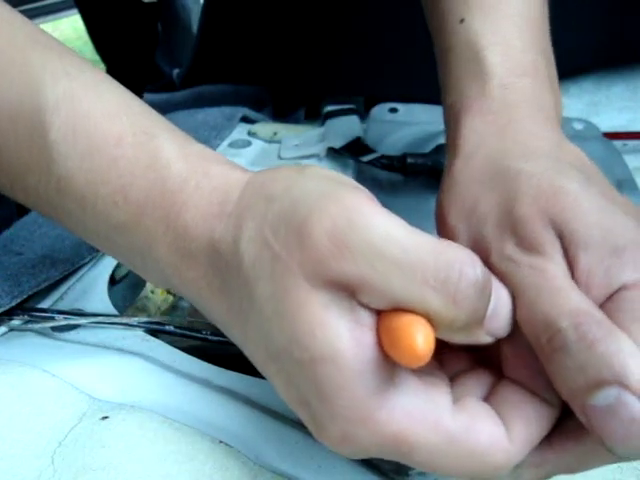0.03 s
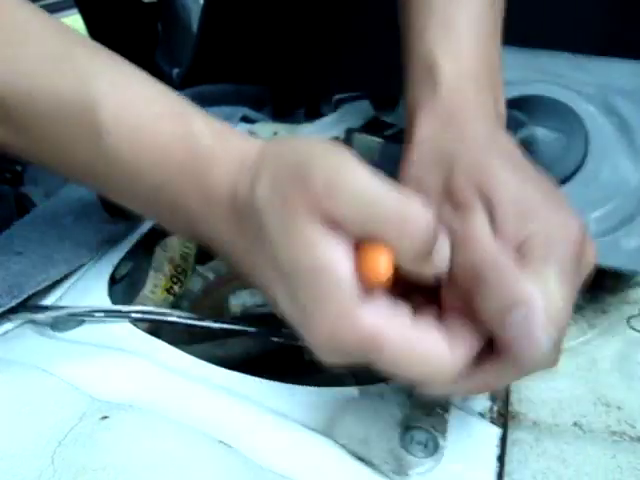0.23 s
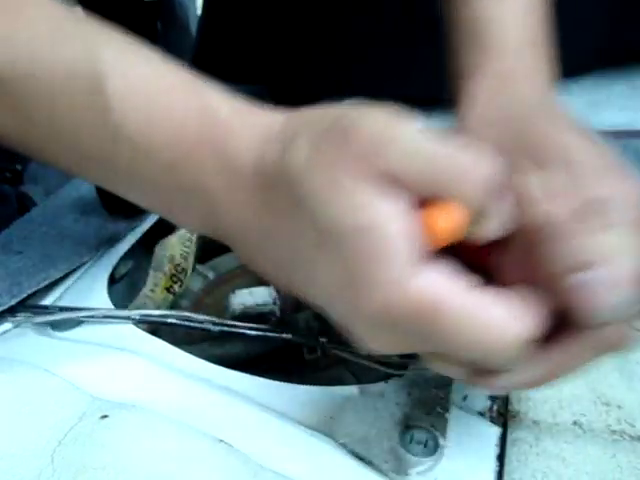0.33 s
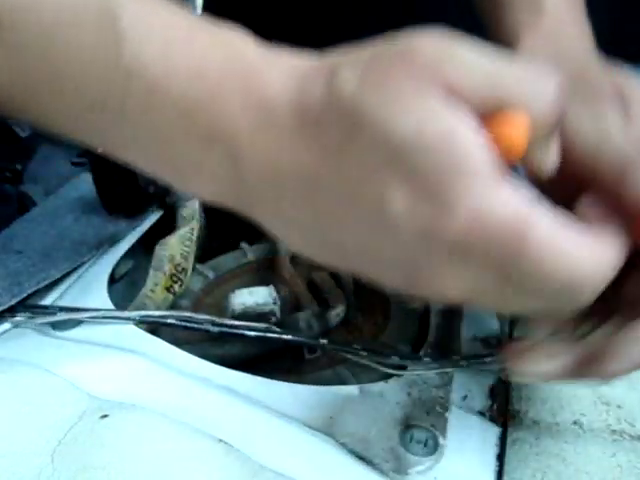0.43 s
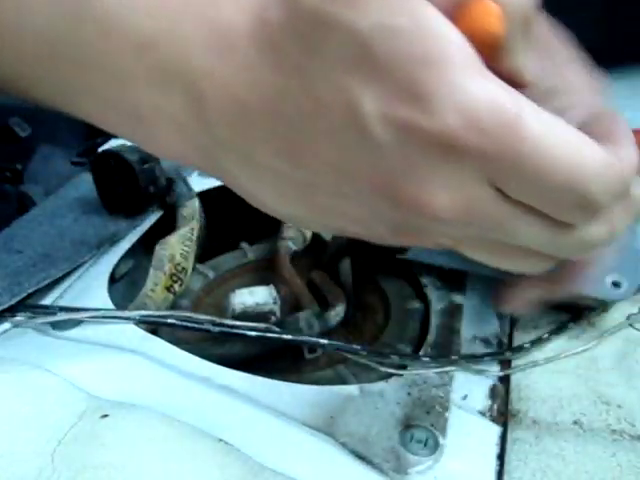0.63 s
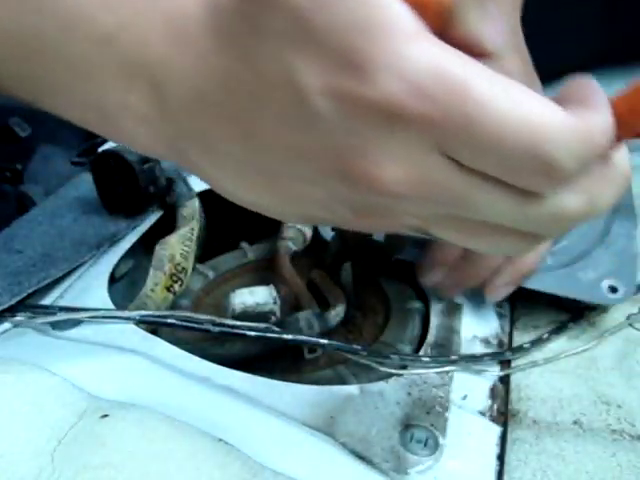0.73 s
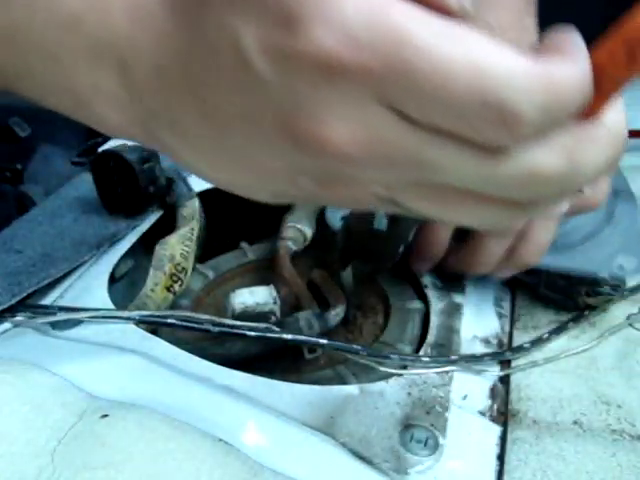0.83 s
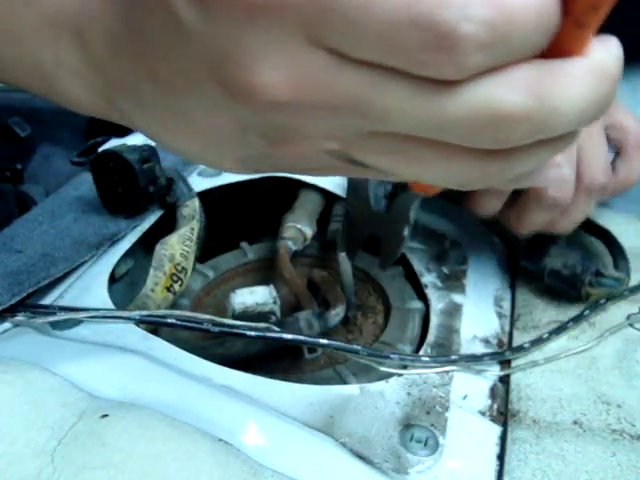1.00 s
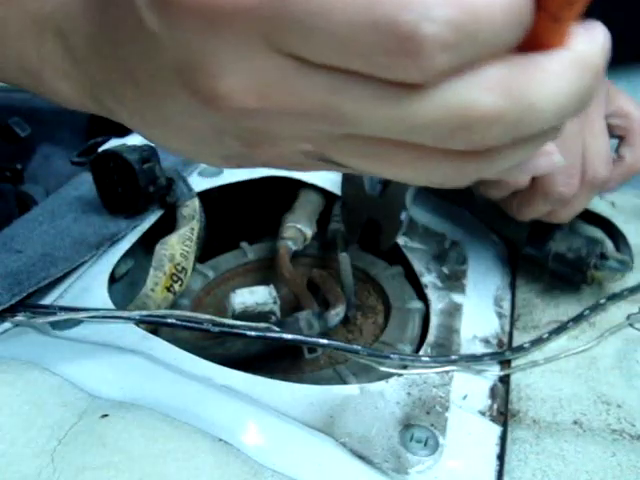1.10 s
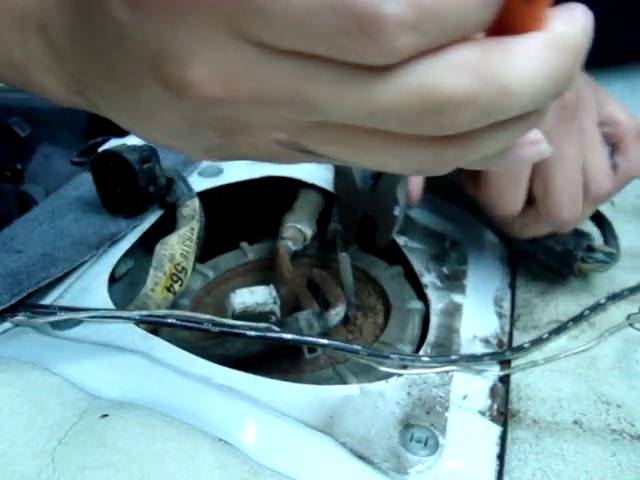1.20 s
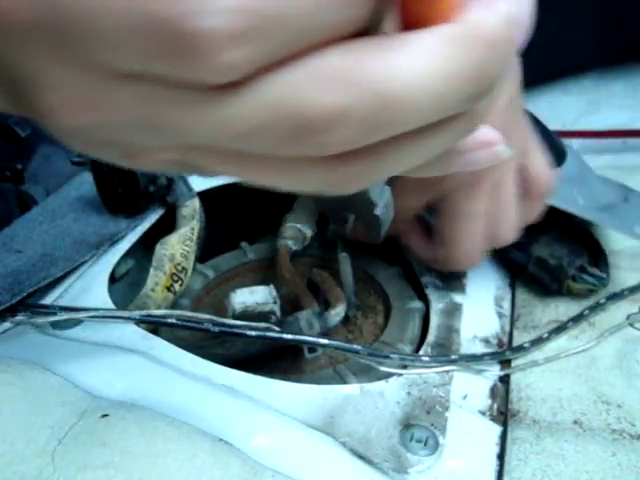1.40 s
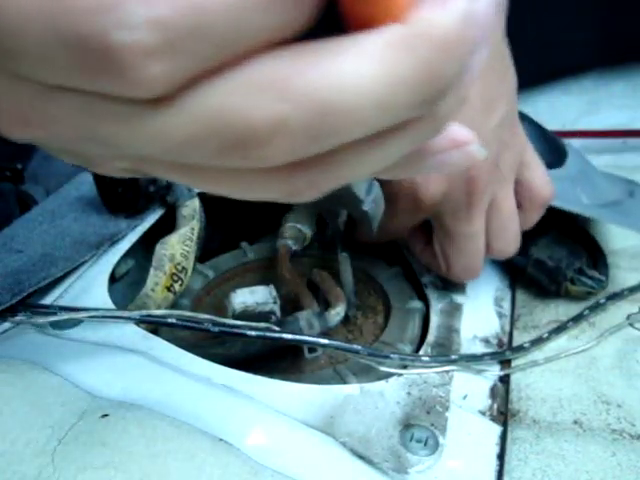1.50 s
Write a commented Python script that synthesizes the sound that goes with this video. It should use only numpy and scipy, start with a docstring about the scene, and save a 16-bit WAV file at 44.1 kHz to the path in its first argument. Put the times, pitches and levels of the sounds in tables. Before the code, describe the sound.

Pliers clank and chatter on a steel fitting. Quiet air and a faint rub come first; at 0.25 seconds a thin metal cover scrapes with low knocks until 0.4. A sharp clank at 0.44 leads to dense, raspy rattling through 0.8, loudest near 0.64. Lighter clinks follow around 0.95, then soft rubbing at 1.15-1.3 and small dull knocks near 1.35-1.43. Close, dry, slightly thin pickup.

```python
"""Inside a car, hands work a hose loose: a thin metal cover is dragged over the floor pan, pliers clank and
chatter against a steel fitting, then dull knocks and a faint rubbing follow, over quiet air.
Impact and friction are shaped noise that excites damped resonators; blows add decaying sine knocks.
Brief cabin reverberation follows the near sources, and a small camera pickup limits and filters the sum."""
import sys
import numpy as np
from scipy import signal
from scipy.fft import rfft, irfft
from scipy.io import wavfile
from scipy.ndimage import uniform_filter1d

SR = 44100
rng = np.random.default_rng(int(sys.argv[2]) if len(sys.argv) > 2 else 0)


def pcm_store(signal):
    """Save signal as 16-bit PCM."""
    levels = np.round(np.clip(np.atleast_2d(signal), -1, 1) * 32767)
    wavfile.write(sys.argv[1], SR, levels.astype(np.int16).T)


N = 68355  # samples

# All levels are relative to later gains; t60 is the time to fall by 60 dB.
# Blows and slips: t/s, level/dB, thud/dB, clank/dB and rasp/dB against the level,
# rise/s, contact duration/s, t60/s, clank f/Hz
BLOWS = [(0.111, -32.5, -13, -10.5, -10.5, 0.0012, 0.0091, 0.058, 1110),
         (0.274, -10.5, -6, -4, -27, 0.00071, 0.0098, 0.038, 545),
         (0.292, -11.5, -12, -5, -37, 0.0024, 0.013, 0.034, 229),
         (0.373, -13.5, -8, -8.5, -22, 0.0021, 0.003, 0.028, 450),
         (0.44, -6.5, -11.5, -3, -7, 0.00061, 0.0028, 0.089, 937),
         (0.444, -14, -19, -15.5, -1, 0.0022, 0.035, 0.045, 1180),
         (0.496, -22, -10, -5.5, -1, 0.0018, 0.019, 0.062, 840),
         (0.519, -21, -11, -0.5, -13.5, 0.0029, 0.013, 0.067, 856),
         (0.558, -18.5, -7, -3.5, -3.5, 0.01, 0.012, 0.079, 863),
         (0.582, -13.5, -17.5, -11, -3.5, .002, 0.0072, 0.083, 867),
         (0.604, -10, -12, -3.5, -12.5, 0.00074, 0.0048, 0.058, 1096),
         (0.625, -21.5, -5, -1, 5.5, 0.001, 0.0037, 0.018, 1040),
         (0.639, -5, -19.5, -12.5, -6.5, 0.0075, 0.015, 0.015, 840),
         (0.683, -9.5, -19, -9, -4.5, 0.0051, 0.013, 0.01, 900),
         (0.7299, -9.5, -21.5, -9.5, -4, 0.00067, 0.011, 0.044, 950),
         (0.743, -10, -25.5, -19.5, -8, 0.0034, 0.01, 0.014, 837),
         (0.781, -12.5, -21, -13, -5.5, 0.0036, 0.012, 0.012, 912),
         (0.826, -27, -14, -13.5, -3.5, 0.0023, 0.016, 0.067, 1355),
         (0.843, -24, -33, -12, -10.5, 0.0051, 0.013, 0.023, 827),
         (0.9328, -17.5, -16.5, -11, -14.5, 0.0014, 0.0086, 0.12, 1095),
         (0.9604, -24.5, -14, -1.5, -8.5, 0.0082, 0.0058, 0.12, 1096),
         (0.997, -34.5, -7.5, -6.5, -14.5, 0.0028, 0.016, 0.093, 1060),
         (1.031, -29.5, -7, -12, -16, 0.0053, 0.013, 0.099, 860),
         (1.064, -34.5, -18, -4.5, -11, 0.0013, 0.0044, 0.043, 884),
         (1.206, -31.5, -6.5, -13, -14.5, 0.0011, 0.017, 0.023, 483),
         (1.245, -42, -19, -7, -31, .002, 0.0045, 0.078, 326),
         (1.3384, -25.5, -6.5, -7.5, -12.5, 0.0012, 0.0043, 0.058, 855),
         (1.3941, -21, -1.5, -9, -17.5, 0.005, 0.0039, 0.044, 469),
         (1.4296, -31, -14, -7, -6, 0.00023, 0.0044, 0.064, 1040)]
# Modes of the steel fitting: f/Hz, level/dB, t60/s
STEEL_MODES = [(233.5, -7.5, 0.36), (292, -15, 0.3), (523, -6, 0.21), (723, -1.5, 0.1), (860.5, -2, 0.23),
               (1054, -7, 0.27), (1133.6, -3, 0.35), (1322, -2.5, 0.23), (1749, 0, 0.04), (1945, -7, 0.33),
               (2155, -2.5, 0.3), (2474, -8.5, 0.25), (2636, 6.5, 0.13), (2802, 6.5, 0.098),
               (3142, -6.5, 0.42), (3610, -9.5, 0.1), (3809, 1, 0.18), (4238, 1.5, 0.075),
               (4520, -2, 0.018), (5260, -3.5, 0.0088), (5904, -4, 0.024), (7210, -3.5, 0.018)]
# Spectrum of the blow contacts: f/Hz, level/dB
BLOW_SPECTRUM = [(100, -51.5), (170, -41), (284, 6), (654, 3), (859, 3.5), (1430, 3), (2690, -7),
                 (10000, -18), (13000, -112.5)]
# Edges of the thud, clank and rasp bands: f/Hz
BLOW_EDGES = [170, 700, 2000, 10400]
# Drag of the cover: t/s, bass level/dB, middle level against bass/dB, treble level against bass/dB
DRAG_LEVELS = [(0.195, -41, -11, -21), (0.205, -52.5, 3.5, 4.5), (0.247, -17, -12, 1),
               (0.257, -18, 2.5, 5.5), (0.275, -18, -18, -7), (0.323, -27.5, 9.5, 4),
               (0.357, -40.5, -13, -21), (0.377, -28.5, -6.5, -8), (0.413, -43, -16, -1.5),
               (0.432, -43.5, 10.5, -52)]
# Modes of the thin metal cover: f/Hz, level/dB, t60/s
COVER_MODES = [(230, -13, 0.11), (269.3, -4.5, 0.068), (398, -9, 0.021), (531, 0, 0.038), (701, 2, 0.12),
               (1123, 4, 0.02), (1464, 8.5, 0.02), (1637, -1.5, 0.021), (1860, -0.5, 0.027),
               (2247, -2, 0.43), (2820, 2.5, 0.034)]
# Spectrum of the dragging rasp: f/Hz, level/dB
DRAG_SPECTRUM = [(35, -71), (60, -5), (221, -24), (362, -8), (533, -16.5), (632, -6), (703, -34.5),
                 (800, -5), (10000, -32.5), (13000, -84)]
# Edges of the bass, middle and treble drag bands: f/Hz
DRAG_EDGES = [70, 800, 2500, 10300]
# Three strokes of rubber and skin: t/s, level/dB, treble level against it/dB
RUB_STROKES = [
    [(0.09, -43.5, -2), (0.124, -65, 8), (0.14, -45, 8), (0.2, -65, -3)],
    [(1.07, -46.5, 3), (1.14, -53, 2.5), (1.165, -37.5, -0.5), (1.21, -38, -1), (1.28, -36.5, -3.5),
     (1.335, -56, 1)],
    [(1.44, -42, 2), (1.475, -53, 8), (1.55, -62, 4)],
]
# Spectrum of the rubbing: f/Hz, level/dB
RUB_SPECTRUM = [(100, -47), (278, -2.5), (514, -23), (917, 10.5), (1250, -8), (2650, -10.5), (10000, -25),
                (13000, -89)]
# Spectrum of the background air: f/Hz, level/dB
AIR_SPECTRUM = [(18, -54), (30, -15.5), (404, -6.5), (1180, -8), (3110, -17.5), (9070, -26), (10000, -31),
                (13000, -62)]

DULL_HZ = 890  # clank pitch below which the rattle weakens
STEEL_RING_DB, CLANK_Q, CLANK_DB = -13.5, 12.8, 3
KNOCK_DB, SNAP_DB, STRIKE_DB, SNAP_S = 2.5, -2.5, 19, 0.0017  # clean tone, crack and kick of first contact
DRAG_RING_DB = -10.5
AIR_DB = -46.5
CABIN_T60_S, CABIN_DB = 0.075, -10
TOP_HZ = 10300  # upper cutoff of the pickup


def blows():
    """Impact excitation: a short rough contact radiates a thud, clank and rasp, and drives the steel modes."""
    force, radiated = np.zeros(N), np.zeros(N)
    contact = grit(spread_db=1.5)
    coloured = colour(contact, BLOW_SPECTRUM)
    edges = list(zip(BLOW_EDGES, BLOW_EDGES[1:]))
    rough = [flutter(per_s=270, depth_db=5.5) for _ in edges]
    push = [r * unit(band(contact, *e)) for r, e in zip(rough, edges)]
    grind = [r * unit(band(coloured, *e)) for r, e in zip(rough, edges)]

    for s, db, thud_db, clank_db, rasp_db, rise, lasts, t60, hz in BLOWS:
        start = int(s * SR)
        at = slice(start, min(start + SR // 4, N))
        u = np.arange(at.stop - start) / SR
        t60 = max(t60, 0.005)
        swell = np.minimum(u / max(rise, 0.0002), 1)
        shape = undb(db) * swell * 1000.0 ** (-np.maximum(u - lasts, 0) / t60)
        # The crack weakens as the rise lengthens
        shape = shape + undb(db + SNAP_DB) * np.exp(-(u + rise) / SNAP_S)

        clank = unit(signal.lfilter(*signal.iirpeak(hz, CLANK_Q, SR), contact[at]))
        bright = min(hz / DULL_HZ, 1) ** 2  # low knocks carry little rattle
        knock = np.sin(2 * np.pi * hz * u) * 1000.0 ** (-u / (t60 + 5.6 * lasts))
        radiated[at] += undb(db + clank_db + KNOCK_DB) * swell * knock
        # A one-sample kick strikes the steel
        force[start] += undb(db + rasp_db + STRIKE_DB) * np.exp(-rise / SNAP_S)

        gains = undb([thud_db, clank_db, rasp_db])
        driving = (push[0][at], undb(-4.5) * clank + bright * push[1][at], push[2][at])
        heard = (grind[0][at], undb(CLANK_DB) * clank + bright * grind[1][at], grind[2][at])
        for gain, push_part, heard_part in zip(gains, driving, heard):
            force[at] += gain * even(push_part, shape)
            radiated[at] += gain * even(heard_part, shape)
    return undb(-3.0) * radiated + undb(STEEL_RING_DB) * ring(force, STEEL_MODES)


def drag():
    """Friction excitation: grit under the cover rasps and drives the modes of its sheet."""
    out = 0
    for b in range(3):
        gain = flutter(per_s=240, depth_db=6.0) * curve(DRAG_LEVELS, 1)
        if b > 0:
            gain = gain * curve(DRAG_LEVELS, 1 + b)
        lo, hi = DRAG_EDGES[b], DRAG_EDGES[b + 1]
        rasp = gain * unit(band(colour(grit(spread_db=6.5), DRAG_SPECTRUM), lo, hi))
        force = gain * unit(band(grit(spread_db=2.0), lo, hi))
        out = out + undb(0.5) * rasp + undb(DRAG_RING_DB) * ring(force, COVER_MODES)
    return out


def rub():
    """Soft friction: rubber and skin radiate shaped noise and lightly excite the steel modes."""
    out = 0
    hiss = colour(grit(spread_db=4.0), RUB_SPECTRUM)
    for stroke in RUB_STROKES:
        gain = curve(stroke, 1) * flutter(per_s=120, depth_db=3.5)
        body = unit(band(hiss, 180, 1500))
        treble = curve(stroke, 2) * unit(band(hiss, 1290, 11000))
        out = out + undb(-2.0) * gain * (body + treble)
        out = out + undb(-18) * ring(gain * grit(spread_db=7.0), STEEL_MODES)
    return out


def cabin(near):
    """Diffuse reverberation: convolution with exponentially decaying noise, delayed by 3 ms."""
    u = np.arange(SR // 4) / SR
    response = rng.standard_normal(len(u)) * 1000.0 ** (-u / CABIN_T60_S) * (u > 0.003)
    response = response / np.sqrt(np.sum(response ** 2))
    return undb(CABIN_DB) * signal.fftconvolve(near, response)[:N]


def air():
    """Stationary noise filtering: spectrally shaped background air wavers a little in level."""
    return undb(AIR_DB) * unit(colour(rng.standard_normal(N), AIR_SPECTRUM)) * flutter(per_s=5, depth_db=1.5)


def ring(x, modes):
    """Modal resonance: decaying two-pole modes, each damped unevenly by the grip, add by their levels."""
    out, power = 0, 0
    for hz, db, t60 in modes:
        r = np.exp(-np.log(1000) / (max(t60, 0.005) * SR))  # pole radius
        g = undb(db) * np.sqrt(1 - r * r)
        poles = [1, -2 * r * np.cos(2 * np.pi * hz / SR), r * r]
        mode = g * signal.lfilter([1, 0, -1], poles, x)
        out = out + mode * flutter(per_s=97, depth_db=5.0)
        power += undb(db) ** 2
    return out / np.sqrt(power)


def grit(spread_db):
    """Contact roughness: dense random pulses have very uneven sizes, normalized to rms 1."""
    size_db = spread_db * np.minimum(rng.exponential(size=N), 4)
    return unit(rng.standard_normal(N) * undb(size_db))


def flutter(per_s, depth_db):
    """Random amplitude modulation: the level glides between draws within 1.7 times depth_db."""
    k = int(SR / per_s)
    steps = np.repeat(rng.uniform(-1.7, 1.7, N // k + 1), k)
    return undb(depth_db * uniform_filter1d(steps, k)[:N])


def curve(table, col):
    """Amplitude envelope: a dB column is interpolated in time, at -120 dB outside the table."""
    table = np.array(table)
    return undb(np.interp(np.arange(N) / SR, table[:, 0], table[:, col], left=-120, right=-120))


def even(x, shape):
    """Energy normalization: x is scaled to rms 1 as weighted by the shape, then given that shape."""
    return shape * x * np.sqrt(np.sum(shape ** 2) / np.sum((shape * x) ** 2))


def colour(x, table):
    """Spectral shaping: gain in dB is interpolated over log frequency."""
    hz, db = np.array(table).T
    f = np.maximum(np.arange(N // 2 + 1) * SR / N, 1)
    return irfft(rfft(x) * undb(np.interp(np.log(f), np.log(hz), db)), N)


def band(x, lo_hz, hi_hz):
    """Band limitation: a Butterworth filter passes frequencies between the edges."""
    return signal.sosfilt(signal.butter(2, [lo_hz, hi_hz], "bandpass", fs=SR, output="sos"), x)


def unit(x):
    """Power normalization: the signal is scaled to rms 1."""
    return x / np.sqrt(np.mean(x ** 2))


def undb(db):
    """Logarithmic level: dB is converted to an amplitude ratio."""
    return 10 ** (np.asarray(db) / 20)


def scene():
    """Superposition: the near sources, their reverberation and the background air add."""
    near = blows() + drag() + rub()
    return (near + cabin(near) + air())[None]


def record(dry):
    """Saturation and filtering: the camera rounds the loudest peaks, trims the bass and cuts the top."""
    loud = 0.7 * np.tanh(dry / 0.7)
    highpass = signal.butter(3, 190, "highpass", fs=SR, output="sos")
    thin = signal.sosfilt(highpass, loud) - undb(-15) * loud
    return signal.sosfilt(signal.ellip(10, 0.2, 75, TOP_HZ, fs=SR, output="sos"), thin)


dry = scene()
out = record(dry)
pcm_store(out)
```